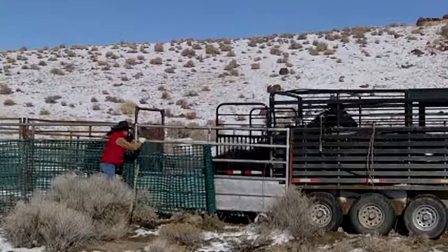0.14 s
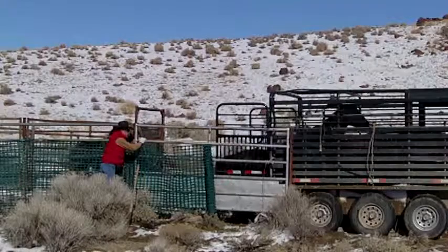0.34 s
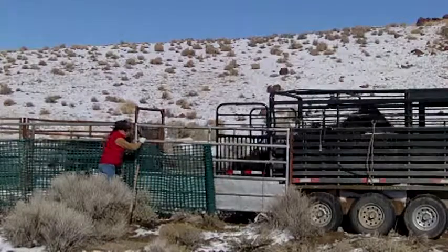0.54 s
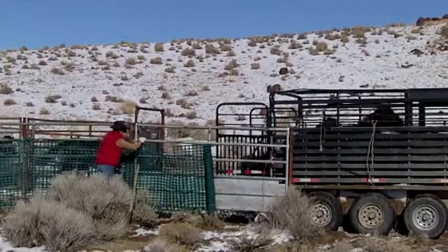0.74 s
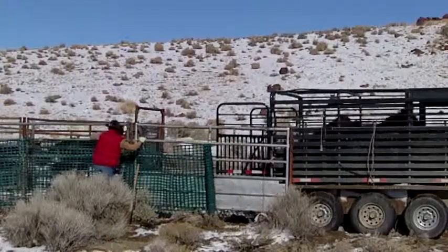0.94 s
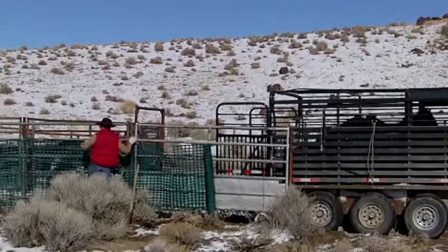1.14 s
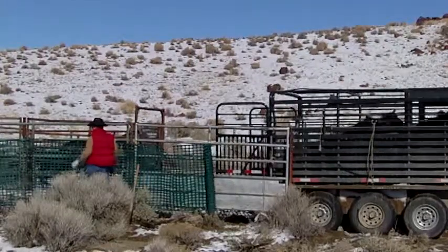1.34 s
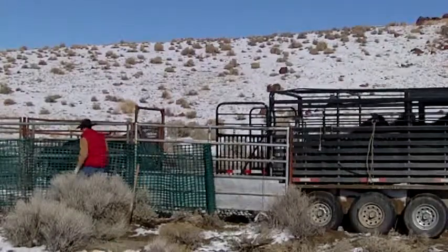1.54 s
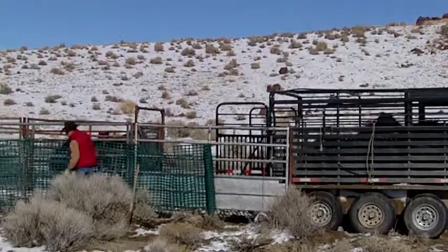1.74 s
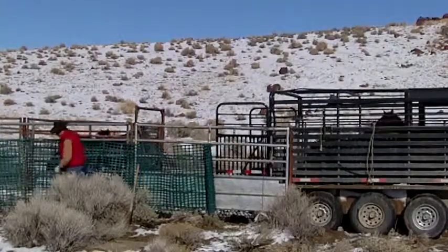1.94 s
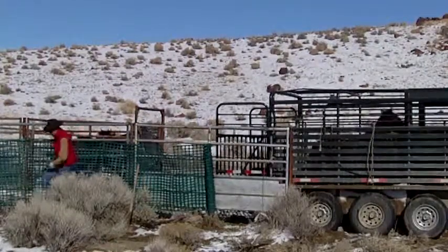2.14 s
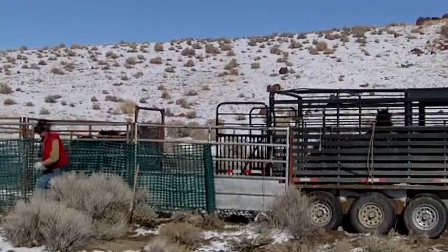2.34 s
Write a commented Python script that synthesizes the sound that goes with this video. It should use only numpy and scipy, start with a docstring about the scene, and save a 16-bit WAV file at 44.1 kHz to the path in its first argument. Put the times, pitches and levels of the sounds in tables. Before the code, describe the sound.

A steel stock trailer takes a hard, rattling double bang from horses and rings on, then duller hoof thuds, shuffling, light clanks and a scrape follow; open country, light wind, microphone some way off, mono.

```python
"""Open country, the microphone some way off from a steel stock trailer that horses crowd into.
The steel side takes a loud double bang and rings: banded noise that decays, plus struck modes.
Hooves thud and shuffle on the deck, bars and fittings clank, single parts sing and squeak, and panels
scrape in uneven slips as the animals push forward. Light wind (shaped noise) and a faint low hum
(a wavering sine) lie beneath."""
import sys
import numpy as np
from scipy import signal
from scipy.fft import rfft, irfft
from scipy.io import wavfile
from scipy.ndimage import uniform_filter1d

SR = 44100
rng = np.random.default_rng(int(sys.argv[2]) if len(sys.argv) > 2 else 0)


def waveform_to_disk(signal):
    """Save audio, clipped to [-1, 1], as 16-bit WAV at the path in sys.argv[1]."""
    frames = np.transpose(np.atleast_2d(signal))
    scaled = np.clip(frames, -1, 1) * 32767
    samples = np.round(scaled).astype(np.int16)
    wavfile.write(sys.argv[1], SR, samples)


N = 110250
TIME = np.arange(N) / SR  # s

# Heavy blows on the steel side: (time [s], level [dB], brightness [dB per octave])
BANGS = [(0.241, -19.5, -0.5), (0.279, -14, 2.5), (0.286, -18.5, 3), (0.318, -28, -4.5), (0.426, -24.5, 1)]
# Spectrum of the blows: (frequency [Hz], density [dB per Hz])
BANG_COLOUR = [(80, -72), (200, -35), (380, -20.5), (600, -11.5), (800, 1), (1050, -4.5), (1400, 0),
               (1630, -7.5), (2000, -3.5), (3000, -1.5), (3800, -5), (4300, -13.5), (5000, -12.5),
               (5700, -15.5), (8700, -20), (11500, -30), (15000, -42)]
# Ringing modes of the steel side: (frequency [Hz], relative level [dB], t60 [s])
STEEL_MODES = [(808, -7, .7), (1126, -5, .6), (1368, -7, .75), (2173, -6, .5), (2284, -5, .6),
               (2458, -7, .7), (2912, 0, .68), (2944, -5, .6), (3117, -1, .62), (3153, -7, .56),
               (3390, -5, .57), (3819, -6, .7), (4753, -7, .8), (4950, -10, .75), (8562, -19, .5)]


def steel_side():
    """Heavy blows crash through the steel, leave it rattling and ring its modes."""
    wash = crash(BANGS, BANG_COLOUR, attack_s=0.0058, body_t60=0.17, tail_t60=1.0, tail_db=-6,
                 damping=0.45, rough_db=0.0)
    rattle = chatter(rate=220, t60=0.015, steady=2.5)
    ringing = struck_modes(BANGS, STEEL_MODES, spread_db=3)
    return wash * rattle + from_db(-24.5) * ringing


# Hooves on the deck: (time [s], level [dB], brightness [dB per octave])
HOOVES = [(0.108, -34.5, -4), (0.424, -28, -3), (0.608, -37.5, -8.5), (0.82, -42.5, 1), (0.915, -45.5, -10),
          (1.007, -42, 5.5), (1.229, -35, 3.5), (1.306, -40, -6), (1.428, -41.5, 1), (1.622, -40.5, 5.5),
          (1.687, -39.5, 5.5), (1.715, -36, -4), (1.909, -33.5, -2.5), (2.186, -41.5, 2),
          (2.268, -42.5, -2), (2.381, -35, 1.5), (2.392, -39, -5.5)]
# Spectrum of the thuds: (frequency [Hz], density [dB per Hz])
HOOF_COLOUR = [(60, -44), (260, -16), (340, -16.5), (520, 4.5), (800, 4), (1300, 1.5), (1650, -6.5),
               (2100, -19), (4000, -21), (8000, -29.5), (15000, -53)]
# Ringing modes of the deck, also played by shuffling(): (frequency [Hz], relative level [dB], t60 [s])
DECK_MODES = [(270, -16, .2), (477, -7, .2), (535, -8, .18), (577, -5, .25), (755, -5, .25), (795, -6, .25),
              (905, -4, .3), (1003, -3, .4), (1290, -6, .3)]


def hooves():
    """Dull, hollow thuds: each blow decays as noise and rings the modes of the deck."""
    thud = crash(HOOVES, HOOF_COLOUR, attack_s=0.0057, body_t60=0.17, tail_t60=0.45, tail_db=-8.5,
                 damping=0.17, rough_db=1.0)
    ringing = struck_modes(HOOVES, DECK_MODES, spread_db=7)
    return thud + from_db(-13.5) * ringing


# The herd shuffling on the deck: (time [s], level [dB])
SHUFFLE = [(0.2, -46.5), (0.5, -40), (0.78, -46.5), (1.33, -41.5), (1.45, -47.5), (1.9, -50.5), (2.12, -53)]
# Spectrum of the soft steps: (frequency [Hz], density [dB per Hz])
SHUFFLE_COLOUR = [(50, -19), (130, -19.5), (260, -6.5), (360, -13), (550, 1), (950, 3), (1350, 2),
                  (1700, -5), (3000, -14), (9000, -37)]


def shuffling():
    """Many soft steps merge into an uneven hollow rumble and keep the deck ringing."""
    steps = level(SHUFFLE) * chatter(rate=35, t60=0.22, steady=0.29)
    return steps * noise(SHUFFLE_COLOUR) + from_db(-4) * rubbed_modes(steps, DECK_MODES)


# Light clanks of bars and fittings: (time [s], level [dB], brightness [dB per octave])
CLANKS = [(0.0, -36, -6.5), (0.556, -35.5, -2.5), (0.645, -41.5, -2.5), (0.796, -54, 3.5), (0.845, -52, 6),
          (0.958, -43.5, 0.5), (0.993, -37, 1.5), (1.008, -34.5, -7), (1.07, -56, 14), (1.128, -48, 7.5),
          (1.234, -41.5, 5), (1.304, -43.5, 3), (1.485, -32.5, -4.5), (1.609, -35, 1), (1.71, -34.5, 0.5),
          (1.755, -37, -0.5), (1.855, -43.5, -3.5), (1.952, -50.5, 10), (2.04, -51, 3.5), (2.191, -62, 16),
          (2.27, -56, 9.5), (2.384, -41, -1.5), (2.403, -46.5, 1)]
# Spectrum of the clanks: (frequency [Hz], density [dB per Hz])
CLANK_COLOUR = [(200, -40), (600, -17.5), (950, -3), (1600, -4), (1950, 11), (2300, -2), (3500, -3),
                (6000, -15), (10000, -24.5), (15000, -43.5)]


def fittings():
    """Bright clanks of loose steel: a short body and a longer tail whose treble dies first."""
    return crash(CLANKS, CLANK_COLOUR, attack_s=0.0031, body_t60=0.06, tail_t60=0.64, tail_db=-2.0,
                 damping=0.56, rough_db=-2.8)


# Knocks that set one panel or fitting singing: (time [s], pitch [Hz], level [dB], t60 [s])
PINGS = [(0.109, 414, -40, 0.11), (0.428, 537, -30, 0.28), (0.822, 273, -43.5, .13), (1.179, 245, -48, .13),
         (1.222, 472, -36, 0.32), (1.295, 270, -45, 0.17), (1.429, 264, -42.5, 0.13),
         (1.486, 1868, -43, 0.16), (1.486, 2067, -44, 0.65)]


def singing_parts():
    """A knock sets one panel or fitting ringing as a single decaying sine."""
    return sum(from_db(db) * ring(clicks(np.array([s]), [1]), hz, t60) for s, hz, db, t60 in PINGS)


# Groans and squeaks of steel on steel:
# (middle time [s], half length [s], middle pitch [Hz], level [dB], rise to either side [share of pitch])
SQUEAKS = [(0.165, .055, 570, -40.5, .05), (0.375, .028, 790, -27, -.015), (0.413, .008, 6600, -38, 0),
           (0.892, .028, 2830, -49, 0)]


def squeaks():
    """Steel on steel groans as a gliding sine, unsteady in pitch and rough in level."""
    out = 0
    for s, length, hz, db, rise in SQUEAKS:
        glide = rise * np.tanh((TIME - s) / length)
        pitch = hz * (1 + glide + 0.011 * drift(rate=260))
        tone = np.sin(2 * np.pi * np.cumsum(pitch) / SR)
        swell = np.exp(-((TIME - s) / length) ** 2)
        out = out + from_db(db + 2.8 * drift(rate=200)) * swell * tone
    return out


# Hides and hooves rubbing along the panels: (time [s], level [dB])
SCRAPE = [(0, -45), (0.22, -64), (0.78, -60.5), (0.96, -45.5), (1.1, -45.5), (1.25, -50), (1.45, -60),
          (1.58, -39), (1.73, -31.5), (1.86, -38.5), (1.95, -44.5), (2.12, -56.5), (2.5, -54.5)]
# Spectrum of the rubbing: (frequency [Hz], density [dB per Hz])
SCRAPE_COLOUR = [(400, -47), (800, 5), (1200, 4.5), (1650, -3), (2500, -3), (3700, -7), (4900, -19.5),
                 (7000, -26), (10300, -35.5), (15000, -66)]
# Modes of the rubbed panels: (frequency [Hz], relative level [dB], t60 [s])
PANEL_MODES = [(930, -1, .25), (995, -2, .25), (1138, 0, .3), (1216, -2, .25), (1345, -2, .2),
               (1887, -5, .2), (2467, -5, .2), (2588, -4, .2), (3063, -4, .2), (3420, -3, .2)]


def panels():
    """Rubbing is a run of uneven slips that rattle the panels and ring their modes."""
    rub = level(SCRAPE) * chatter(rate=110, t60=0.034, steady=0.74)
    return rub * noise(SCRAPE_COLOUR, RIPPLE_DB) + from_db(-5.5) * rubbed_modes(rub, PANEL_MODES)


# Spectrum of the light wind: (frequency [Hz], density [dB per Hz])
WIND = [(25, -30), (260, 9), (368, -14.5), (552, -15), (1270, -5.5), (1660, -15), (2010, 7.5),
        (2400, -25.5), (8810, -16.5), (13200, -26.5), (15500, -50)]


def wind():
    """Light wind: shaped noise whose level wanders a little."""
    return noise(WIND) * from_db(-60.5 + 1.0 * drift(rate=6.1))


# The faint low hum: (time [s], level [dB rms])
HUM_LEVEL = [(0, -65), (1.0, -64), (1.6, -66.5), (2.1, -80)]


def low_hum():
    """A low sine near 86 Hz that wavers in pitch."""
    pitch = 86 * (1 + 0.027 * drift(rate=38.2))
    return np.sqrt(2) * level(HUM_LEVEL) * np.sin(2 * np.pi * np.cumsum(pitch) / SR)


BAND_EDGES_HZ = np.geomspace(44, 17000, 23)
MODE_SPACING_HZ, RIPPLE_DB = 22.34, 4  # close resonances that colour the noise


def crash(hits, colour, attack_s, body_t60, tail_t60, tail_db, damping, rough_db):
    """Countless close modes: each band swells at a blow, drops fast, then rings on; the treble dies first."""
    s, db, bright = np.transpose(hits)
    hz = np.arange(N // 2 + 1) * SR / N
    low, high = BAND_EDGES_HZ[:-1], BAND_EDGES_HZ[1:]
    centres = np.sqrt(low * high)
    octaves = np.log2(centres / 1000)  # from 1 kHz
    # Brightness tilts the spectrum of each blow; the bands share its energy.
    tilted = from_db(at_hz(colour, centres) + bright[:, None] * octaves)
    share = tilted ** 2 * np.diff(BAND_EDGES_HZ)
    energy = from_db(db)[:, None] ** 2 * share / share.sum(axis=1, keepdims=True)
    spectrum = rfft(noise(colour, RIPPLE_DB))
    rise = np.exp(-1 / (attack_s * SR))
    out = 0
    for k, octave in enumerate(octaves):
        band = rms_one(irfft(spectrum * ((hz >= low[k]) & (hz < high[k])), N))
        blows = clicks(s, energy[:, k])
        band_tail_t60 = tail_t60 * 2 ** (-damping * max(octave, 0))
        power = dying(blows, body_t60) + from_db(tail_db) ** 2 * dying(blows, band_tail_t60)
        swelling = signal.lfilter([1 - rise], [1, -rise], power)
        out = out + band * np.sqrt(swelling)
    return out * from_db(rough_db * drift(rate=480))


def struck_modes(hits, modes, spread_db):
    """Each blow rings every mode with a strength of its own."""
    s, db, _ = np.transpose(hits)
    chance = rng.standard_normal((len(s), len(modes)))
    out = 0
    for k, (hz, mode_db, t60) in enumerate(modes):
        strengths = from_db(db + mode_db + spread_db * chance[:, k])
        out = out + ring(clicks(s, strengths), hz, t60)
    return out


def rubbed_modes(strength, modes):
    """Countless small contacts keep the modes ringing, as loud overall as their strength."""
    push = strength * rng.standard_normal(N)
    return push.std() * rms_one(sum(from_db(db) * ring(push, hz, t60) for hz, db, t60 in modes))


def chatter(rate, t60, steady):
    """Loudness of uneven contacts (rate per second), each dying away, over a steady share; rms 1."""
    contacts = (rng.random(N) < rate / SR) * from_db(1.4 * rng.standard_normal(N)) ** 2
    loudness = np.sqrt(dying(contacts, t60) + steady)
    return rms_one(uniform_filter1d(loudness, size=40))


def ring(push, hz, t60):
    """A two-pole resonator: a unit click sets a sine of height 1 ringing and dying by 60 dB in t60."""
    r, w = from_db(-60 / (t60 * SR)), 2 * np.pi * hz / SR
    return signal.lfilter([0, np.sin(w)], [1, -2 * r * np.cos(w), r * r], push + 1e-18)


def dying(energy, t60):
    """Energy put in leaks away by 60 dB in t60."""
    kept = from_db(-60 / (t60 * SR)) ** 2
    return signal.lfilter([1], [1, -kept], energy + 1e-20)


def clicks(times, sizes):
    """One single-sample click per contact."""
    return np.bincount(np.clip(times * SR, 0, N - 1).astype(int), sizes, N)


def noise(colour, ripple_db=0):
    """Noise of unit rms with the given spectrum; ripple gathers it into close resonances."""
    hz = np.maximum(np.arange(N // 2 + 1) * SR / N, 1)
    knots = np.clip(rng.standard_normal(4000), -2, 2)
    ripple = np.interp(hz / MODE_SPACING_HZ, np.arange(len(knots)), knots)
    ripple = ripple * np.minimum(hz / 4000, 1)  # shallower below 4 kHz
    shape = from_db(at_hz(colour, hz) + ripple_db * ripple)
    return rms_one(irfft(rfft(rng.standard_normal(N)) * shape, N))


def drift(rate):
    """Random wander: straight lines between normal draws of spread 1, rate draws per second."""
    knots = rng.standard_normal(2000)
    return np.interp(TIME * rate, np.arange(len(knots)), knots)


def level(points):
    """A dB curve over time as gain per sample."""
    return from_db(np.interp(TIME, *np.transpose(points)))


def at_hz(points, hz):
    """Read a spectrum in dB on a log-frequency axis."""
    point_hz, point_db = np.transpose(points)
    return np.interp(np.log(hz), np.log(point_hz), point_db)


def rms_one(x):
    """Scale to unit rms."""
    return x / np.sqrt(np.mean(x ** 2) + 1e-20)


def from_db(db):
    """Decibels to gain."""
    return 10 ** (np.asarray(db) / 20)


def scene():
    """The trailer and the open air around it, on one channel."""
    trailer = steel_side() + hooves() + shuffling() + fittings() + singing_parts() + squeaks() + panels()
    return (trailer + wind() + low_hum())[None]


def record(dry):
    """The recorder drops the deep bass, has a narrow notch in the treble and cuts the top."""
    low_cut = signal.butter(4, 72, "high", fs=SR, output="sos")  # Hz
    thinned = signal.sosfilt(low_cut, dry)
    notched = signal.lfilter(*signal.iirnotch(7850, 22, fs=SR), thinned)  # Hz, Q
    top_cut = signal.ellip(10, .2, 80, 15500, fs=SR, output="sos")  # order, ripple dB, stop dB, Hz
    return signal.sosfilt(top_cut, notched)


dry = scene()
out = record(dry)
waveform_to_disk(out)
```